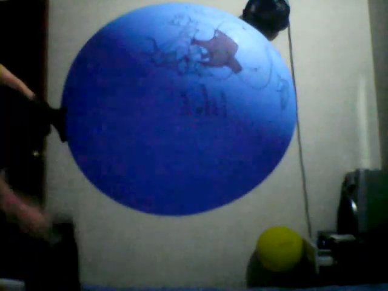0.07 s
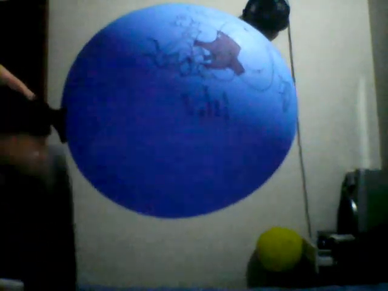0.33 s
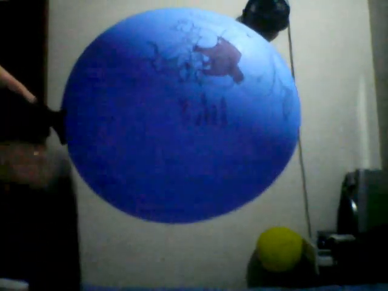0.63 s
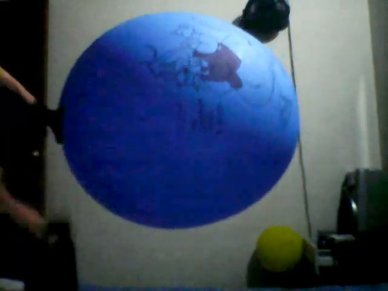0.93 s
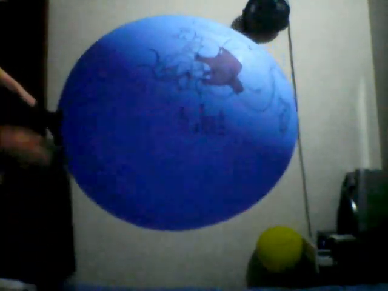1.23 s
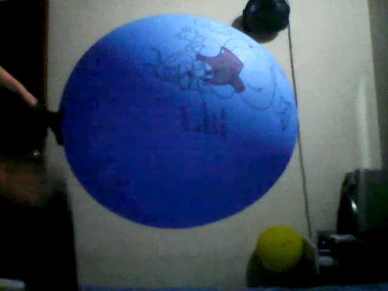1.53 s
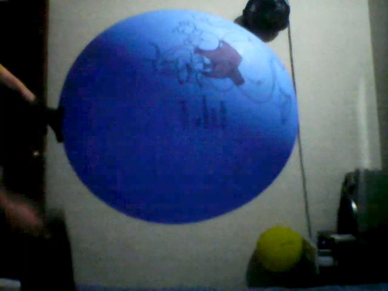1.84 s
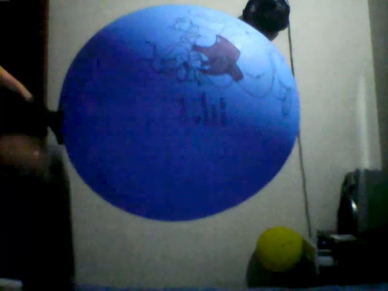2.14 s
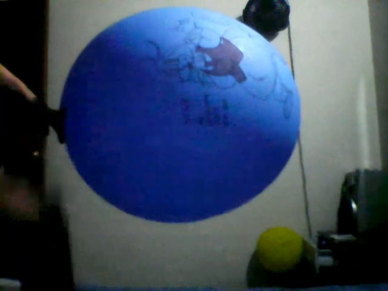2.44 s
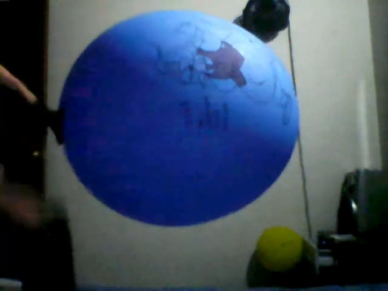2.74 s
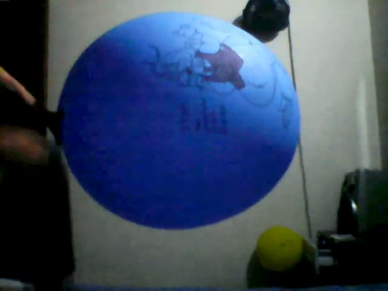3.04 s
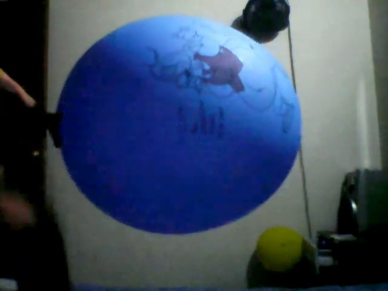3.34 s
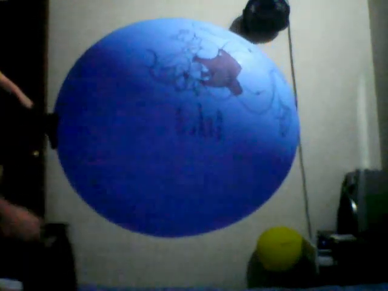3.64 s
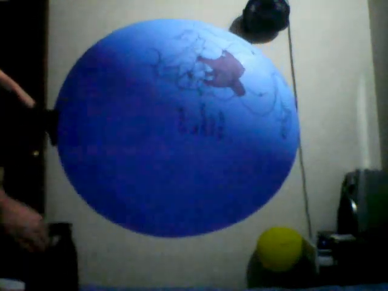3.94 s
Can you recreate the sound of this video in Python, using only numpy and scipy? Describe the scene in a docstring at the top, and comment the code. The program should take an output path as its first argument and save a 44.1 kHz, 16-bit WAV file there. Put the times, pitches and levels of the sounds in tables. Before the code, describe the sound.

A hand pump inflates a large balloon with steady hissing strokes and knocks.

```python
"""A small room: a double-action hand pump fills a large balloon, one push and pull about every 0.85 s.
Each stroke hisses through the nozzle and rings the air in the balloon. At each turn the piston
clicks or rubs, the pump body thumps and a valve knocks open. The balloon shudders after the last
stroke. A faint boom and quiet room air lie underneath."""
import sys
import numpy as np
from scipy import signal
from scipy.fft import rfft, irfft
from scipy.io import wavfile

SR = 44100
rng = np.random.default_rng(int(sys.argv[2]) if len(sys.argv) > 2 else 0)


def dump_mix(stems):
    """Bounce the given channels to the path in sys.argv[1] as a 16-bit WAV at rate SR."""
    frames = np.atleast_2d(stems).T  # one column per channel
    limited = np.clip(frames, -1, 1)  # hard clip at full scale
    pcm = np.round(limited * 32767).astype(np.int16)
    wavfile.write(sys.argv[1], SR, pcm)


N = 176400
T = np.arange(N) / SR
HZ = np.maximum(np.fft.rfftfreq(N, 1 / SR), 1)


def undb(db):
    return 10 ** (np.asarray(db) / 20)


def unit_rms(x):
    return x / np.sqrt(np.mean(x ** 2))


def decay(t60_s):
    return np.exp(-np.log(1000) * T / t60_s)


def convolve(x, response):
    return signal.fftconvolve(x, response[:SR])[:N]


def colour(points):
    """Gain spectrum through (frequency [Hz], level [dB]) points."""
    hz, db = np.array(points).T
    return undb(np.interp(np.log(HZ), np.log(hz), db))


def resonances(rows):
    """One complex response per resonance."""
    return np.array([undb(db) / (1 + 1j * (HZ ** 2 - hz ** 2) / (HZ * width_hz))
                     for hz, width_hz, db in rows])


def noise(gain):
    """Shaped noise, rms 1."""
    return unit_rms(irfft(rfft(rng.standard_normal(N)) * gain, N))


def wander(rate_hz):
    """Smooth random drift, rms 1."""
    return noise(np.exp(-np.minimum(HZ / rate_hz, 20) ** 2))


def tick(points):
    """Minimum-phase pulse of the given colour, peak 1."""
    cepstrum = irfft(np.log(colour(points)), N)
    causal = 2 * cepstrum * (np.arange(N) < N // 2)
    pulse = irfft(np.exp(rfft(causal)), N)
    return pulse / np.abs(pulse).max()


def ring(modes, scatter_db=2):
    """Decaying modes of a struck part; their balance varies per blow."""
    waves = np.zeros(N)
    for hz, db, t60_s in modes:
        gain = undb(db + scatter_db * rng.standard_normal())
        waves += gain * np.sin(2 * np.pi * hz * T) * decay(t60_s)
    return waves * (T < 0.5)


def impulses(rows):
    """One impulse per row."""
    out = np.zeros(N)
    for time_s, db in rows:
        out[int(np.clip(time_s * SR, 0, N - 1))] += undb(db)
    return out


def room(x, wet_db):
    """Direct sound, early scatter and a short tail."""
    fade = decay(t60_s=0.37) + undb(-41) * decay(t60_s=0.017)
    tail = rng.standard_normal(N) * fade * (T > .003)
    return x + undb(wet_db) * convolve(x, tail / np.linalg.norm(tail))


def airflow(strokes, hiss, ring_db, leak_db):
    """The jet gets louder and brighter with piston speed and rings the balloon."""
    # air modes of balloon and neck (frequency [Hz], width [Hz], level [dB])
    air_modes = [(450, 14, -2), (705, 20, -1), (1840, 20, 1), (2152, 16, 4), (2324, 16, 3), (2368, 22, 2),
                 (2478, 18, 5), (3466, 14, 1), (3656, 16, 1), (3805, 16, 1), (6394, 25, -2), (6746, 25, -2),
                 (7063, 22, 0)]
    treble_hz, leak_s, ring_lag_s = 7800, 0.21, 0.018
    jet = noise(colour(hiss)) * undb(0.86 * wander(rate_hz=44))
    treble = irfft(rfft(jet) / (1 + (treble_hz / HZ) ** 10), N)
    cavity_gain = np.linalg.norm(resonances(air_modes), axis=0)
    cavity = irfft(rfft(noise(colour(hiss))) * cavity_gain, N)
    flow, treble_flow = np.zeros(N), np.zeros(N)
    for start_s, length_s, db, peak in strokes:
        ramp = np.interp(T, start_s + length_s * np.array([0, peak, 1]), [0, 1, 0])
        speed = np.sin(np.pi / 2 * ramp)
        flow += undb(db) * speed ** 1.47
        treble_flow += undb(db) * speed ** 2.9
    # barrel pressure bleeds off after a stroke
    leak = undb(leak_db) * convolve(flow, np.exp(-T / leak_s) / (leak_s * SR))
    flow = np.hypot(flow, leak)
    ringing = undb(ring_db) * cavity * np.interp(T - ring_lag_s, T, flow)
    hissing = (jet - treble) * flow + treble * treble_flow
    return room(hissing + ringing, wet_db=-8.5) * undb(-1.08)


def pull():
    """The back stroke drives a softer, duller jet through the nozzle."""
    # pulls (start [s], length [s], relative level [dB], speed peak [fraction of length])
    strokes = [(-.11, 0.38, -42, 0.45), (.765, .36, -42, 0.39), (1.61, 0.33, -42, 0.44),
               (2.47, .37, -42.5, 0.33), (3.32, 0.36, -44, 0.35)]
    # nozzle spectrum (frequency [Hz], relative density [dB])
    hiss = [(100, -5), (350, -7), (1200, -8), (2300, -6), (3200, -7), (4600, -7), (5500, -2), (6600, -4.5),
            (8000, -14.5), (9800, -28), (12000, -37), (15500, -50)]
    return airflow(strokes, hiss, ring_db=-1.5, leak_db=-9.5)


def room_air():
    """Quiet steady noise."""
    # air spectrum (frequency [Hz], relative density [dB])
    air_spectrum = [(25, -40), (42, -18), (65, -2), (150, 0.5), (400, -6.5), (800, -6), (1500, -8.5),
                    (3000, -21.5), (6300, -17), (8500, -39), (12000, -41.5), (15500, -45)]
    return undb(-57) * noise(colour(air_spectrum))


def boom(pitch_hz=61):
    """A faint low tone swells and fades."""
    # boom envelope (time [s], level [dB])
    boom_levels = [(0.0, -78), (0.5, -68), (0.59, -48), (0.83, -62), (1.47, -78), (1.61, -45.5),
                   (1.79, -59.5), (3.02, -53.5), (3.07, -74), (3.4, -53.5), (3.97, -60), (4.0, -86)]
    time_s, db = np.array(boom_levels).T
    phase = 2 * np.pi * pitch_hz * T + 0.84 * wander(rate_hz=2.6)
    level_db = np.interp(T, time_s, db) + 0.8 * wander(rate_hz=3.3)
    return np.sqrt(2) * np.sin(phase) * undb(level_db)


def seal_rub(slips_per_s=1724, scatter_db=4.5, top_hz=7000):
    """At the end of a pull, uneven slips of the piston seal ring the barrel."""
    # rubs (time [s], level [dB])
    rubs = [(.256, -45), (1.10, -46.5), (1.986, -48), (2.799, -42), (3.678, -42)]
    # barrel resonances (frequency [Hz], width [Hz], relative level [dB])
    barrel_modes = [(280, 120, -1), (686, 59, 3), (1000, 140, -4.5), (1140, 240, -6.5), (1400, 120, -15),
                    (3000, 4000, -20)]
    slips = (rng.random(N) < slips_per_s / SR) * undb(-scatter_db * rng.standard_normal(N))
    grip = convolve(impulses(rubs), decay(t60_s=0.52))
    barrel = resonances(barrel_modes).sum(axis=0) / (1 + (HZ / top_hz) ** 10)
    return irfft(rfft(unit_rms(slips) * grip) * barrel, N) / np.sqrt(np.mean(np.abs(barrel) ** 2))


def body_thump(attack_s=.006):
    """The pump thumps against the balloon as the piston turns; a wall echoes it."""
    # thumps (time [s], level [dB])
    thumps = [(0.273, -34), (.688, -36), (0.765, -46.5), (1.119, -34), (1.607, -37.5), (1.628, -42),
              (2.017, -36.5), (2.375, -41), (2.455, -39), (2.818, -31), (3.238, -33.5), (3.317, -36.5),
              (3.698, -30)]
    # thump modes: pump body, the lowest one the balloon's (frequency [Hz], level [dB], t60 [s])
    thump_modes = [(119.2, -8, 0.34), (138, 6.5, 0.067), (151.7, -3.5, 0.16), (267.6, -14, 0.21),
                   (390, -10.5, 0.15)]
    # wall echo (delay [s], level [dB])
    wall_echo = [(.0245, -9)]
    attack = 1 - np.exp(-(T / attack_s) ** 2)
    direct = np.zeros(N)
    for time_s, db in thumps:
        start = int(time_s * SR)
        direct[start:] += undb(db) * (ring(thump_modes) * attack)[:N - start]
    return room(direct + convolve(direct, impulses(wall_echo)), wet_db=-17)


def valve_knock(round_trip_s=.00435, trip_loss_db=7):
    """Reversing flow knocks the valve open; the crack bounces across the balloon."""
    # knocks (time [s], level [dB], low-pass cutoff [Hz])
    knocks = [(.3195, -43, 900), (.328, -22, 1350), (.7552, -29.5, 1360), (1.155, -36, 800),
              (1.163, -22, 1050), (1.547, -36.5, 1490), (1.5992, -30.5, 1700), (2.0065, -34, 880),
              (2.0122, -36.5, 1210), (2.0166, -27, 1420), (2.383, -37, 1400), (2.4495, -30, 1480),
              (2.8825, -28, 815), (2.892, -18.5, 1610), (3.3088, -29.5, 1730)]
    # hollow ring (frequency [Hz], relative level [dB], t60 [s])
    knock_modes = [(118, -26, .25), (232, -10, .18), (264, -11, .14), (414, -10, .17), (450, -8, .2),
                   (500, -7, .11), (590, -4, .035), (700, -9, .07), (755, -16, .06), (900, -16, .06),
                   (1018, -15, .12), (1453, -21, .13)]
    # contact spectrum (frequency [Hz], relative density [dB])
    contact_spectrum = [(80, -20), (250, -5), (450, 0), (680, 1), (850, -5), (1100, -11), (1500, -17),
                        (2200, -25), (6500, -22), (9000, -38), (15000, -56)]
    bounces = impulses([(k * round_trip_s, -k * trip_loss_db) for k in range(8)])
    crack = undb(-1) * convolve(tick(contact_spectrum), bounces)
    out = np.zeros(N)
    for time_s, db, cutoff_hz in knocks:
        knock = crack + undb(-11) * ring(knock_modes)
        knock = signal.lfilter(*signal.butter(2, cutoff_hz, fs=SR), knock[:SR // 2])
        start = int(time_s * SR)
        out[start:start + len(knock)] += undb(db) * knock
    return room(out, wet_db=-1.5)


def push():
    """The forward stroke drives a louder, brighter jet through the nozzle."""
    # pushes (start [s], length [s], relative level [dB], speed peak [fraction of length])
    strokes = [(.325, 0.41, -39.5, 0.34), (1.17, .39, -40, 0.3), (2.0, 0.38, -40, 0.43),
               (2.87, 0.42, -39.5, 0.35)]
    # nozzle spectrum (frequency [Hz], relative density [dB])
    hiss = [(100, -2.5), (350, -2.5), (1200, -1), (2300, 4.5), (3200, 0), (4600, 0.5), (6200, 4), (7200, 4),
            (8100, -7), (9800, -10), (12000, -22.5), (15500, -29.5)]
    return airflow(strokes, hiss, ring_db=0.5, leak_db=-4)


def handle_click():
    """At the end of a push the handle clicks home and its catch chatters."""
    # clicks (time [s], level [dB])
    click_times = [(.6632, -22.5), (1.5192, -28.5), (1.5925, -28), (2.3558, -27.5), (3.223, -22)]
    # plastic contact spectrum (frequency [Hz], relative density [dB])
    click_spectrum = [(100, 24), (450, 15.5), (720, 17.5), (1700, 8), (3200, 9.5), (4300, 10), (5200, -7),
                      (7000, -23), (9000, -63), (15000, -58)]
    # catch chatter (delay [s], level [dB])
    catch_chatter = [(0, -3.5), (.0033, -2), (.0052, -5.5), (.0075, -1)]
    click = convolve(tick(click_spectrum), impulses(catch_chatter))
    return room(convolve(impulses(click_times), click), wet_db=1)


def balloon_shudder(top_hz=1300):
    """The balloon drones briefly when the pump stops."""
    # shudder (start [s], length [s], level [dB])
    shudder_event = (3.74, .24, -53)
    # balloon resonances (frequency [Hz], width [Hz], relative level [dB])
    balloon_modes = [(124, 35, -28.5), (162, 47, -2), (228, 37, -4), (380, 67, -9.5), (490, 50, -13.5),
                     (874, 240, -38)]
    start_s, length_s, db = shudder_event
    swell = np.sin(np.pi * np.clip((T - start_s) / length_s, 0, 1))
    spectrum = np.abs(resonances(balloon_modes)).max(axis=0) / (1 + (HZ / top_hz) ** 4)
    return undb(db) * swell * noise(spectrum)


def scene():
    pump = push() + pull() + valve_knock() + body_thump() + handle_click() + seal_rub()
    return (pump + balloon_shudder() + boom() + room_air())[None]


def record(dry, low_cut_hz=49, top_hz=15350):
    """The small microphone loses the deep bass; the recorder cuts the top."""
    thin = signal.sosfilt(signal.butter(3, low_cut_hz, "high", fs=SR, output="sos"), dry)
    return signal.sosfilt(signal.ellip(10, .1, 80, top_hz, fs=SR, output="sos"), thin)


dry = scene()
out = record(dry)
dump_mix(out)
```